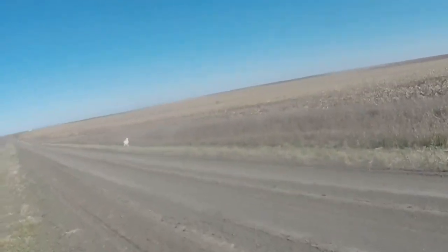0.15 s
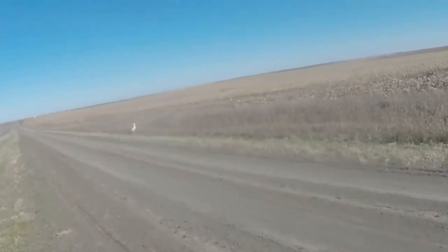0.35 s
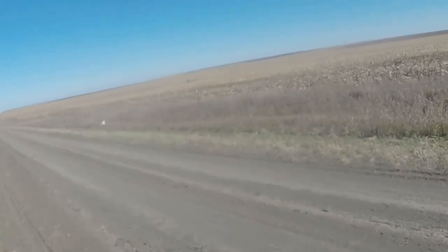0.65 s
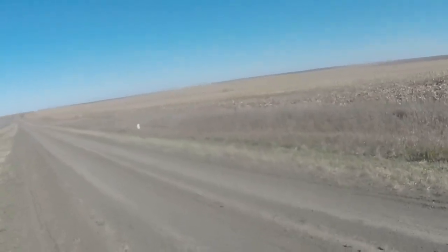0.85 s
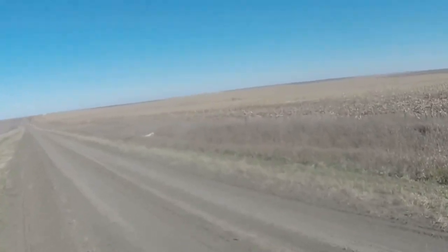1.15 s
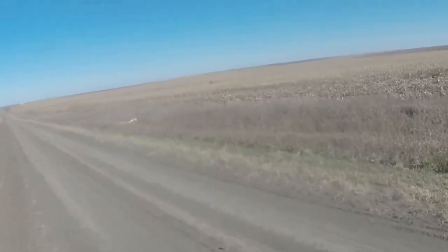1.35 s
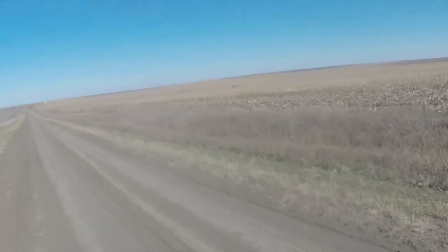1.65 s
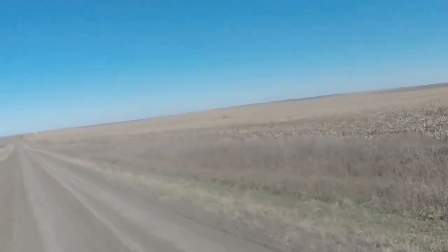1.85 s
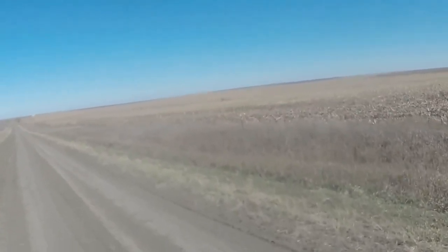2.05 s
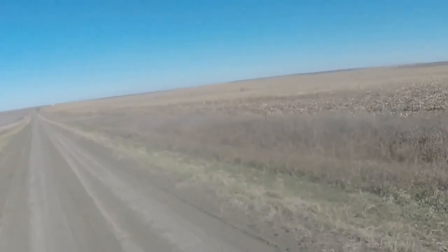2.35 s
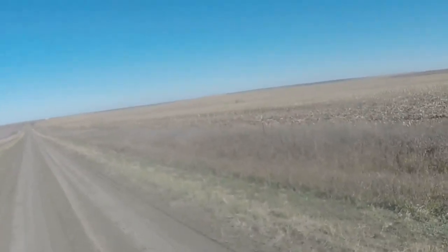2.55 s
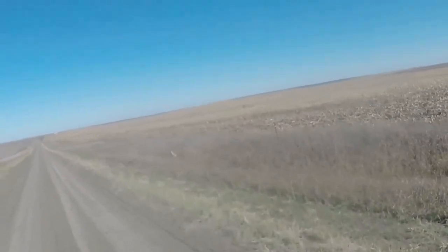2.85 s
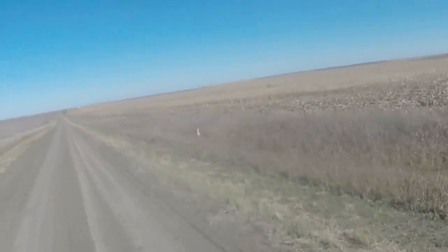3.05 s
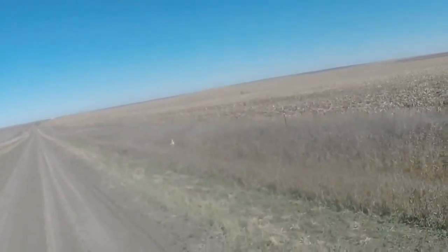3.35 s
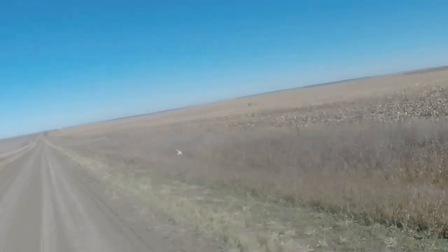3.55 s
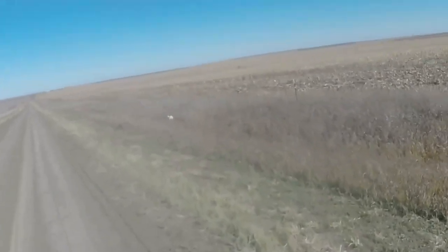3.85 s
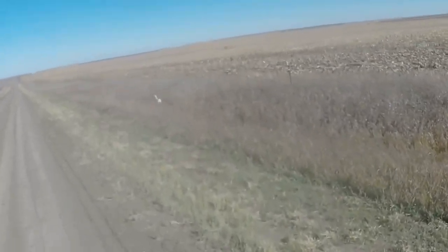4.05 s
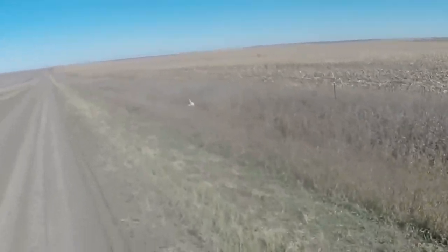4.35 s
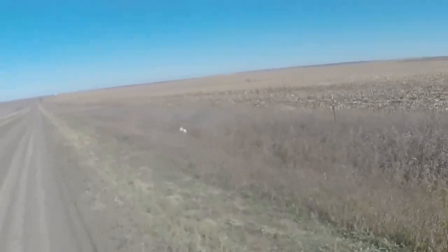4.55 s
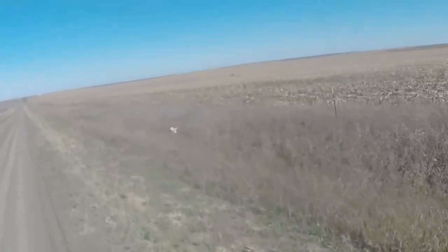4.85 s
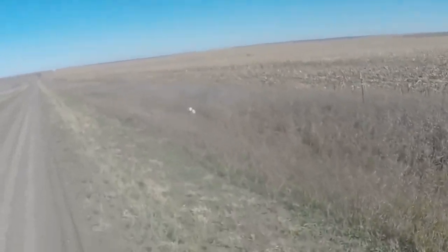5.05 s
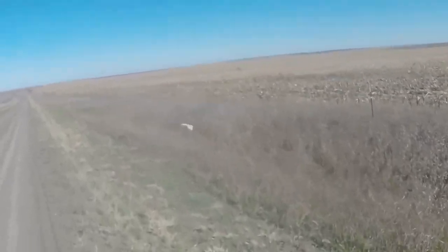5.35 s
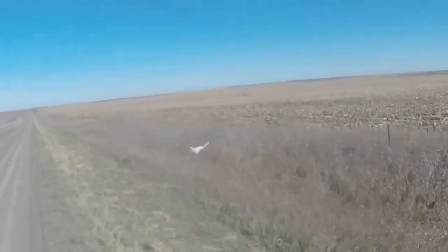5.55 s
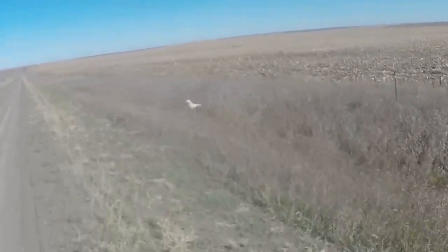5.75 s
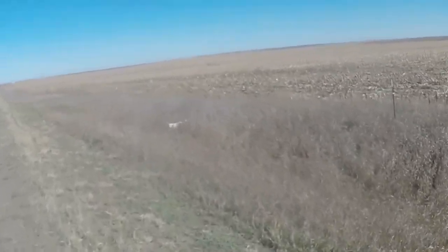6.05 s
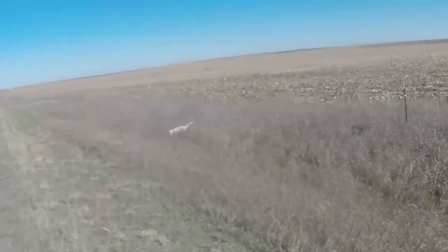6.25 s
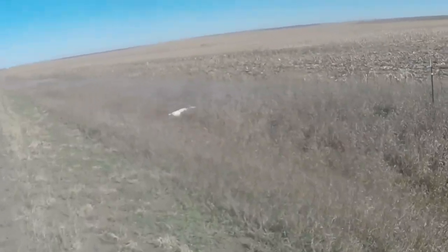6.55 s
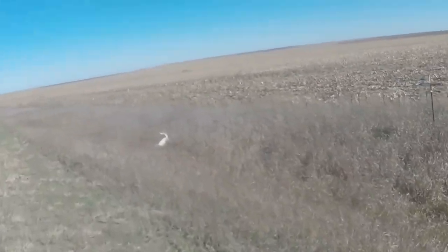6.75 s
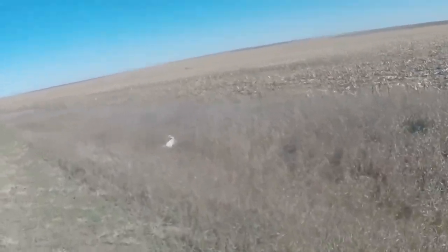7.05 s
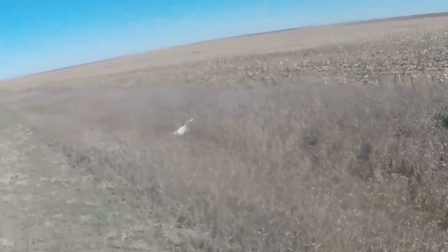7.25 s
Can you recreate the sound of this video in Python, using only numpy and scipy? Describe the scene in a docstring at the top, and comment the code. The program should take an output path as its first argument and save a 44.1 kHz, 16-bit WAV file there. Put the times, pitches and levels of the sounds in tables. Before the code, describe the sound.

A person hurries from a dirt track into dry grass, wearing the microphone. About three steps a second land as low jolts and crunchy thuds. Cloth and stalks rustle close by, wind rumbles, and straps tick and scrape on the case. A hard knock comes near the middle, and more scraping near the end. Open field, mono, no echo, the loudest blow distorting.

```python
"""Hurried footsteps on a dirt track and into dry grass, heard from a small camera strapped to the walker.
Each step swings the camera in a slow jolt and thuds through the mount as noise-driven resonances.
Straps and stalks tick, scrape and knock on the case, as noise and fine grains ringing in narrow bands.
Wind rumbles on the port; cloth and grass rustle close by in flickering bands, over steady far grass.
One microphone in the open, mono, with no echo; the loudest blows clip."""
import sys
import numpy as np
from scipy import signal
from scipy.fft import rfft, irfft
from scipy.io import wavfile
from scipy.ndimage import uniform_filter1d

SR = 44100
rng = np.random.default_rng(int(sys.argv[2]) if len(sys.argv) > 2 else 0)


def put_to_file(sound):
    """Save the sound as 16-bit audio at rate SR, in the file named by the first command-line argument."""
    columns = np.atleast_2d(sound).T  # one column per channel
    safe = np.clip(columns, -1, 1)
    whole_steps = np.round(safe * 32767)
    wavfile.write(sys.argv[1], SR, whole_steps.astype(np.int16))


def gain_from_db(level_db):
    """Convert decibel levels to linear amplitude factors (20 dB per decade)."""
    decades = np.asarray(level_db, float) / 20
    return 10 ** decades


N = 326797
T = np.arange(N) / SR


def colour(x, outline):
    """Filter by an outline of (Hz, dB) that falls away beyond its ends; rms 1."""
    hz, db = np.transpose(outline + [(SR / 2, outline[-1][1] - 60)])
    f = np.arange(len(x) // 2 + 1) * SR / len(x) + 1
    gain_db = np.interp(np.log(f), np.log(hz), db, left=-99)
    y = irfft(rfft(x) * gain_from_db(gain_db), len(x))
    return y / np.std(y)


def ring(x, hz, width):
    """Two-pole resonance, gain 1 at the centre."""
    return signal.lfilter(*signal.iirpeak(hz, hz / width, SR), x)


def steep(x, hz, width):
    """Three resonances in a row, for steep skirts."""
    return ring(ring(ring(x, hz, width), hz, 2 * width), hz, 2 * width)


def walk(rate):
    """Random levels held 1 / rate s and smoothed twice; standard deviation 1."""
    hold = int(SR / rate)
    x = np.repeat(rng.standard_normal(N // hold + 1), hold)
    x = uniform_filter1d(uniform_filter1d(x, hold), hold)[:N]
    return x / np.std(x)


def crackle(per_s, spread_db):
    """Dense tiny snaps whose sizes have a long but bounded tail; rms 1."""
    hit = rng.random(N) < per_s / SR
    size = gain_from_db(spread_db * np.minimum(rng.exponential(size=N), 4))
    x = hit * size * rng.standard_normal(N)
    return x / np.std(x)


def add(out, s, x, db, rms_ms=0):
    """Lay a short sound in at s, with its peak at db, or with db as its rms spread over rms_ms."""
    i = max(int(s * SR), 0)
    x = x[:N - i]
    size = np.sqrt(np.sum(x ** 2) * 1000 / (rms_ms * SR)) if rms_ms else np.max(np.abs(x))
    out[i:i + len(x)] += x * gain_from_db(db) / size


def contact(ms, force):
    """Rough contact: a force that swells and dies on a time scale of ms."""
    u = T[:len(force)] * 1000 / ms
    return force * u ** 1.97 * np.exp(-3.5 * u)


def stroke(s, ms, round_by):
    """Arch-shaped pressure of one drag; a smaller round_by makes a flatter arch."""
    return np.sin(np.pi * np.clip((T - s) * 1000 / ms, 0, 1)) ** round_by


# wind on the port and fizz of dry stalks: time_s, wind_db, fizz_db
AIR_LEVELS = [(0.0, -34, -50.5), (3.69, -33.5, -48), (5.32, -36, -51.5), (5.78, -33.5, -49.5),
              (7.41, -34.5, -49)]
# rustle of cloth and grass close by: time_s, level_db
RUSTLE_LEVELS = [(0.0, -40), (0.19, -41), (0.29, -45), (0.36, -35.5), (0.7, -38), (0.95, -34.5), (1.1, -32),
                 (1.24, -33.5), (1.32, -37), (1.56, -35.5), (1.65, -40), (2.15, -33.5), (2.71, -38.5),
                 (2.83, -34.5), (3.24, -36.5), (3.9, -36.5), (4.64, -38.5), (4.72, -41.5), (5.13, -47.5),
                 (5.29, -40.5), (5.58, -39.5), (5.72, -37), (6.36, -35.5), (6.67, -38.5), (7.41, -36.5)]
# spectra of low wind, wind buffets, rustle and stalk fizz: frequency_hz, relative_level_db (per Hz)
RUMBLE_SPECTRUM = [(8, 14.5), (18, 19), (40, 7), (80, -10), (160, -28)]
BUFFET_SPECTRUM = [(30, 6.5), (60, 7), (126, -2), (240, 0.5), (330, -8), (490, -20), (900, -28)]
RUSTLE_SPECTRUM = [(250, -15), (400, -7), (520, -13.5), (860, -13.5), (1300, -5), (1600, -1.5), (1850, -2),
                   (2100, 2.5), (2400, -1.5), (2720, 1), (3100, -4.5), (3500, -8), (4300, -16.5),
                   (6000, -26)]
FIZZ_SPECTRUM = [(2000, 13), (3500, -3.5), (4500, -3), (5600, -0.5), (7000, -6.5), (10000, -10),
                 (13000, -12.5), (14500, -14), (15500, -45)]
# steady wind in far grass: frequency_hz, relative_level_db (per Hz)
FAR_GRASS_SPECTRUM = [(300, -11), (600, -4.5), (1100, -2.5), (2000, -13), (4000, -57)]
FAR_GRASS_DB = -49


def air():
    """Wind flutters in the lows; rustle and fizz are hiss plus fine crackle, each band flickering alone."""
    time_s, *columns = np.transpose(AIR_LEVELS)
    wind_db, fizz_db = (np.interp(T, time_s, c) for c in columns)
    rustle_db = np.interp(T, *np.transpose(RUSTLE_LEVELS)) + 0.3 * walk(9.8)

    rumble = colour(rng.standard_normal(N), RUMBLE_SPECTRUM) * gain_from_db(wind_db + 8.0 + 2.0 * walk(13))
    buffet = colour(rng.standard_normal(N), BUFFET_SPECTRUM) * gain_from_db(wind_db + 2.6 * walk(45))

    hiss = rng.standard_normal(N) + 0.75 * crackle(2500, 3.0)
    rustle_hz = 300 * 2 ** (np.arange(16) / 3.5)
    patchy = sum(ring(hiss, hz, hz / 5) * hz ** -.5 * gain_from_db(2.8 * walk(21.92)) for hz in rustle_hz)
    rustle = colour(patchy, RUSTLE_SPECTRUM) * gain_from_db(rustle_db)

    grit = rng.standard_normal(N) + 0.49 * crackle(500, 1.4)
    fizz_hz = 3000 * 2 ** (np.arange(6) / 2)
    flicker = sum(ring(grit, hz, hz / 3) * hz ** -.5 * gain_from_db(3.2 * walk(45)) for hz in fizz_hz)
    fizz = colour(flicker, FIZZ_SPECTRUM) * gain_from_db(fizz_db + 0.7 * walk(60))

    far_grass = colour(rng.standard_normal(N), FAR_GRASS_SPECTRUM) * gain_from_db(FAR_GRASS_DB)
    return far_grass + rumble + buffet + rustle + fizz


# heel strikes jolting the camera: centre_s, peak_db, swing_hz, length_ms (between half-height points)
JOLTS = [(0.1308, -14.5, 30, 94), (0.503, -8.5, 26, 56), (0.866, -14, 21.6, 58), (1.2463, -13, 27, 110),
         (1.553, -6, 21, 41), (1.913, -5, 23, 75), (2.243, -4.5, 28.5, 55), (2.618, -8.5, 22.4, 42),
         (2.939, -3.5, 23.3, 48), (3.2904, -11.5, 28, 65), (3.631, -2, 22.4, 86), (3.96, -8.5, 28.6, 93),
         (4.2885, -3.5, 19.5, 72), (4.62, -5.5, 24.2, 79), (4.962, -7.5, 23, 83), (5.315, -6.5, 25.7, 70),
         (5.679, -4.5, 22, 75), (6.018, -8, 31.4, 48), (6.37, -9.5, 22, 114), (6.762, -15.5, 31.6, 92),
         (7.088, -3.5, 27, 56), (7.405, -10.5, 30, 33)]
# shudder during a jolt: frequency_hz, relative_level_db (per Hz)
SHUDDER_SPECTRUM = [(25, 11.5), (50, 3.5), (100, -3), (200, -10.5), (400, -28), (900, -31.5)]


def jolts():
    """The camera swings slowly on its strap as the heel lands, dying slower than it starts, and shudders."""
    out, force = np.zeros(N), np.zeros(N)
    for centre_s, db, hz, ms in JOLTS:
        t = T - centre_s
        half_s = ms / 2000 * (1 + 0.14 * np.sign(t))
        swing = gain_from_db(db) * 2 ** -((t / half_s) ** 2)
        out += swing * np.cos(2 * np.pi * hz * t)
        force += swing
    # the shudder lingers after the swing
    force = signal.lfilter([1 / (0.021 * SR)], [1, 1 / (0.023 * SR) - 1], force)
    return out + gain_from_db(-12.0) * force * colour(rng.standard_normal(N), SHUDDER_SPECTRUM)


# placed ticks of straps and stalks: start_s, peak_db, centre_hz, edge_rms_db (bright), body_rms_db (below)
TICKS = [(0.1411, -33, 4800, -66, -42.5), (0.428, -36, 6200, -60, -46), (0.489, -31, 5200, -60, -37),
         (0.5172, -26, 6700, -63, -47), (0.5728, -30, 5000, -59, -50), (0.994, -26, 3600, -64, -38),
         (1.436, -30, 4500, -60, -36), (2.128, -21.5, 4470, -55, -30), (2.3027, -23.5, 5100, -57, -28),
         (2.433, -44, 8000, -58, -46), (2.4475, -34, 5030, -59, -30), (2.457, -44, 7500, -59, -44),
         (2.4873, -32, 4990, -52, -33), (2.4982, -25, 4740, -48, -39), (2.5644, -12, 3770, -34.5, -27.5),
         (2.682, -30, 4500, -58, -43), (2.699, -30, 5500, -52, -34), (2.7172, -12, 4700, -40, -21),
         (2.816, -24, 4500, -57, -43), (3.489, -25, 4380, -60, -34), (3.6132, -14, 5160, -28.5, -16.5),
         (3.7998, -36, 4200, -59, -35), (3.8217, -34, 4730, -58, -38), (3.8416, -25.5, 4700, -58, -43),
         (3.933, -28.5, 5900, -56, -42), (3.9868, -12.5, 4640, -31, -37), (4.0206, -33, 4800, -51, -36),
         (4.5925, -28, 6970, -56, -37), (4.601, -41, 4190, -47, -24), (4.8187, -33, 4540, -56, -31.5),
         (5.17, -34, 5200, -68, -35.5), (5.339, -21.5, 4570, -38, -47), (5.5486, -32, 4460, -62, -46),
         (5.648, -38, 4090, -49, -44), (5.709, -38, 4370, -53, -46), (5.744, -37, 4710, -62, -39),
         (5.8548, -29.5, 4200, -44.5, -50), (5.8835, -24, 4030, -59, -50), (5.9353, -32, 4760, -52, -29),
         (6.3838, -22, 4570, -45.5, -43), (6.434, -29, 4170, -61, -46), (6.764, -27, 5560, -38, -38),
         (6.8023, -31, 4980, -31, -37), (6.84, -12, 4930, -27.5, -26), (7.0378, -15.5, 4900, -51, -24),
         (7.0604, -17.5, 5000, -52, -21.5), (7.117, -26.5, 6000, -60, -43)]
# resonance width as a share of the centre; decay at 0 dB peak, and its change per dB of level
TICK_WIDTH, TICK_MS, TICK_MS_PER_DB = 0.49, 2.27, 0.1
# further faint ticks at random times: how many, mean peak level, largest departure from it, pitch range
FAINT_COUNT, FAINT_DB, FAINT_SCATTER_DB = 30, -38.5, 4
FAINT_LO_HZ, FAINT_HI_HZ = 3520, 6400


def ticks():
    """Brief dry snaps, each with its own band, a bright edge and a body below."""
    out = np.zeros(N)
    when, size, pitch = rng.random((FAINT_COUNT, 3)).T
    faint_db = FAINT_DB + FAINT_SCATTER_DB * (2 * size - 1)
    faint_hz = FAINT_LO_HZ * (FAINT_HI_HZ / FAINT_LO_HZ) ** pitch
    rows = TICKS + list(zip(when * N / SR, faint_db, faint_hz, faint_db - 28, faint_db - 19))
    for (s, db, hz, edge_db, body_db), noise in zip(rows, rng.standard_normal((len(rows), 2048))):
        t_ms = T[:len(noise)] * 1000
        onset = (1 - np.exp(-t_ms / 0.77)) ** 2
        decay_ms = max(TICK_MS + TICK_MS_PER_DB * db, 1)
        decay = np.exp(-t_ms / decay_ms) + 0.042 * np.exp(-t_ms / 6)
        snap = noise * onset * decay
        body = ring(ring(snap, 2650, 2300), 2700, 3100) + 0.5 * ring(snap, 1300, 1100)
        add(out, s - .0005, steep(snap, hz, TICK_WIDTH * hz), db)
        add(out, s - .0005, steep(snap, 9250, 4900), edge_db, 4.5)
        add(out, s, body, body_db, 2.6)
    return out


# thuds through the mount, some with a rebound just after:
# start_s, thud_peak_db, crunch_rms_db, crunch_hz (its own resonance), rattle_rms_db
THUDS = [(0.186, -9.5, -35, 780, -36), (0.562, -10, -22.5, 580, -32), (0.924, -14, -37, 620, -37),
         (1.242, -21, -27.5, 710, -37), (1.607, -17.5, -30, 1200, -44), (1.639, -20, -50, 886, -49),
         (1.924, -11.5, -26.5, 610, -30), (2.267, -16.5, -31, 567, -39), (2.311, -19, -36, 1070, -36),
         (2.613, -23, -37, 710, -38), (2.962, -18, -43, 590, -42), (3.289, -8, -30.5, 1000, -32),
         (3.314, -23, -34, 605, -35), (3.611, -25, -22, 750, -31), (3.635, -10, -26, 880, -38),
         (3.688, -20, -35.5, 740, -38), (3.788, -21.5, -35, 1350, -41), (3.962, -16.5, -29.5, 1300, -31),
         (4.29, -21, -29, 560, -31), (4.327, -23, -38, 960, -38), (4.621, -12.5, -26.5, 530, -26.5),
         (4.669, -23.5, -54, 554, -46), (4.971, -21, -37, 1000, -37), (5.317, -8, -21, 1000, -28.5),
         (5.353, -24, -33.5, 560, -42), (5.692, -17.5, -25.5, 720, -28), (5.722, -17, -31.5, 593, -32),
         (6.03, -12, -26, 760, -31), (6.384, -14.5, -30, 614, -32), (6.424, -17.5, -48, 552, -43),
         (6.743, -12.5, -25.5, 950, -32), (7.1, -11, -27, 656, -31), (7.138, -15, -46, 993, -42)]
# what the rough contact rings in the mount above the thud: frequency_hz, width_hz, relative_level_db
MOUNT_MODES = [(529, 340, 1.5), (1000, 270, -5.5), (1343, 137, -7)]
# lowest mode of the mount before detuning; spread of the detuning from thud to thud, as a share
THUD_HZ, DETUNE = 238.7, 0.092
RATTLE_HZ, RATTLE_WIDTH_HZ = 2295, 310


def thuds():
    """The rough, stuttering contact crunches through the mount; a soft push rings its lowest mode."""
    out = np.zeros(N)
    for row, noise in zip(THUDS, rng.standard_normal((len(THUDS), 4097))):
        s, db, crunch_db, crunch_hz, rattle_db = row
        hz = THUD_HZ * np.exp(DETUNE * noise[-1])
        noise = noise[:-1]
        stutter = 0.033 + uniform_filter1d(noise[::-1], size=28) ** 2
        rough = contact(9.5, noise * stutter)
        push = contact(2.53, np.ones(len(noise))) + 15 * rough
        add(out, s, ring(ring(push, hz, 44), hz, 550), db)

        crunch = steep(rough, crunch_hz, 350) + 1.27 * steep(rough, 740, 840)
        crunch += sum(gain_from_db(d) * steep(rough, f, w) for f, w, d in MOUNT_MODES)
        add(out, s - .002, crunch, crunch_db, 16)
        add(out, s - .002, steep(rough, RATTLE_HZ, RATTLE_WIDTH_HZ), rattle_db, 4.5)
    return out


# hard knocks on the case: start_s, peak_db
KNOCKS = [(0.5738, -21), (2.3036, -6), (3.6138, 0.5), (3.735, -19), (4.189, -22.5), (6.313, -23.5)]
# modes of the case: frequency_hz, width_hz, relative_level_db
CASE_MODES = [(780, 240, -2.5), (1300, 330, -9), (1790, 180, -9), (2520, 344, 2), (3300, 250, -21)]


def knocks():
    """Something hard strikes the case and its modes ring for a few ms."""
    out = np.zeros(N)
    for (s, db), noise in zip(KNOCKS, rng.standard_normal((len(KNOCKS), 2048))):
        blow = contact(1.33, noise)
        modes = sum(gain_from_db(d) * ring(ring(blow, hz, w), hz, 2 * w) * (hz / w) ** .5 for hz, w, d in CASE_MODES)
        add(out, s - .0007, modes, db)
    return out


# soft brushes, each hissing in one band: start_s, length_ms, centre_hz, width_hz, level_db (before the arch)
BRUSHES = [(0.93, 300, 3450, 1100, -46), (1.07, 40, 1680, 150, -40), (1.16, 35, 1577, 146, -38),
           (1.38, 26, 2770, 250, -36), (4.12, 80, 1650, 200, -37), (4.385, 67, 247, 59, -32),
           (6.285, 39, 2840, 200, -36.5), (6.86, 110, 1660, 260, -43)]
# scrapes of something dragging past the case: start_s, length_ms, level_db (before the arch)
SCRAPES = [(2.12, 37, -51), (2.43, 74, -50), (2.49, 85, -37.5), (2.552, 25, -28), (2.81, 210, -51.5),
           (4.59, 40, -46), (4.63, 62, -45.5), (4.811, 37, -46), (5.93, 30, -45), (6.28, 42, -47),
           (6.775, 62, -38), (6.797, 25, -32.5), (6.834, 15.7, -18.5), (7.02, 56, -41), (7.056, 14, -33)]
# modes of what drags past the case: frequency_hz, width_hz, relative_level_db
SCRAPE_MODES = [(3050, 320, 9.5), (4070, 1450, 10), (5000, 100, 18), (6000, 1500, -7), (7660, 290, 6),
                (9190, 250, 9.5), (12700, 740, 0)]
# flicker of the whole scrape and of each mode, as standard deviations
SCRAPE_FLICKER_DB, MODE_FLICKER_DB = 1.2, 1.8


def scrapes():
    """Stick-slip grains excite the modes of what drags past the case; duller brushes hiss in one band."""
    grains = crackle(4300, 0.54)
    slips = crackle(6000, 1.5)
    modes = sum(gain_from_db(db + MODE_FLICKER_DB * walk(90)) * ring(ring(slips, hz, w), hz, 6 * w)
                for hz, w, db in SCRAPE_MODES)
    pressure = sum(gain_from_db(db) * stroke(s, ms, 1.0) for s, ms, db in SCRAPES)
    out = modes / np.std(modes) * pressure * gain_from_db(SCRAPE_FLICKER_DB * walk(220))
    for s, ms, hz, w, db in BRUSHES:
        band = ring(ring(grains, hz, w), hz, 0.88 * w)
        out += band / np.std(band) * gain_from_db(db) * stroke(s, ms, 0.22)
    return out


def scene():
    """All sources reach one microphone in the open, with no echo."""
    return (air() + jolts() + ticks() + thuds() + knocks() + scrapes())[None]


def roll_off(x):
    """The treble ends steeply here."""
    return signal.sosfilt(signal.butter(12, 15620, fs=SR, output="sos"), x)


def record(dry):
    """The microphone input clips at full scale and a steep low-pass cuts the top at 15.6 kHz."""
    clipped = np.clip(dry, -1, 1)
    low_pass = signal.ellip(8, .2, 70, 15600, fs=SR, output="sos")
    mix = signal.sosfilt(low_pass, clipped)
    return roll_off(mix)


dry = scene()
out = record(dry)
put_to_file(out)
```